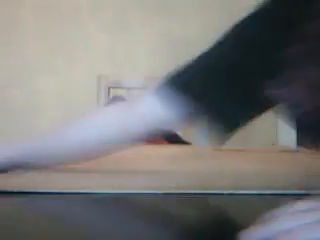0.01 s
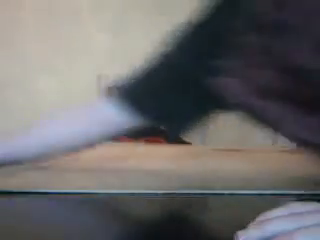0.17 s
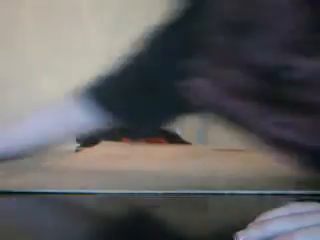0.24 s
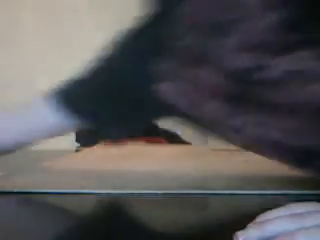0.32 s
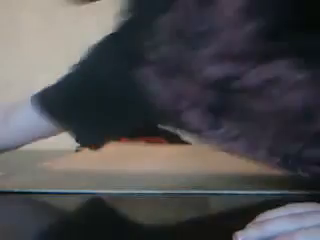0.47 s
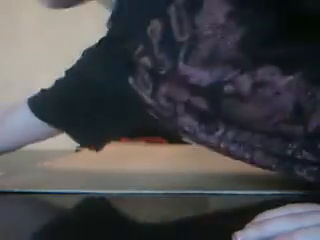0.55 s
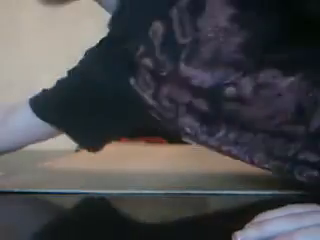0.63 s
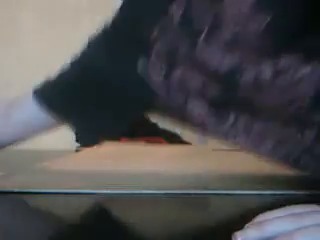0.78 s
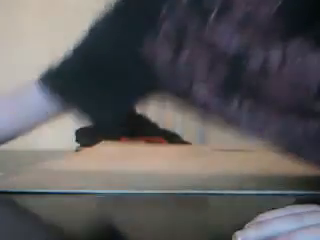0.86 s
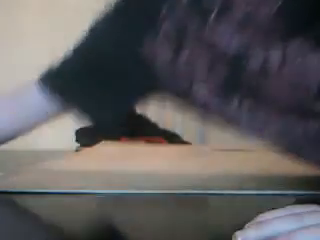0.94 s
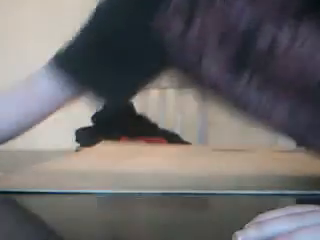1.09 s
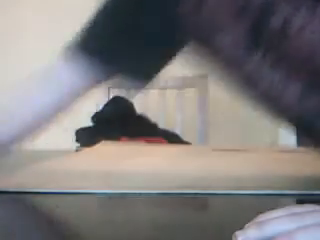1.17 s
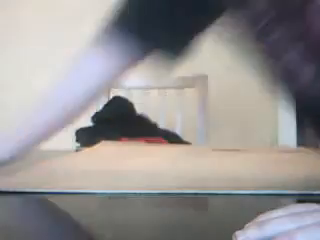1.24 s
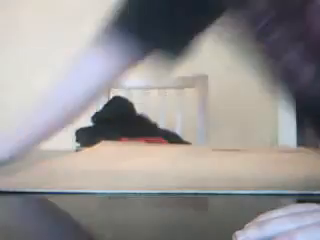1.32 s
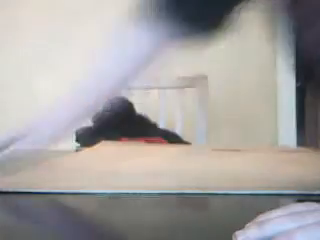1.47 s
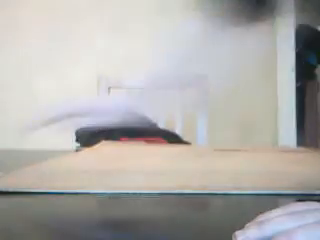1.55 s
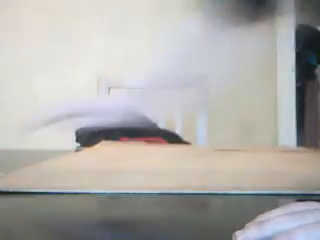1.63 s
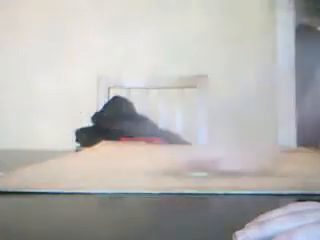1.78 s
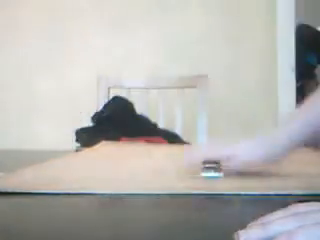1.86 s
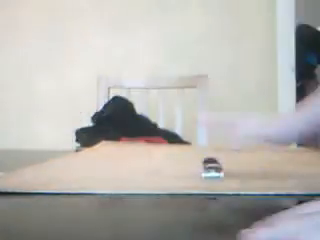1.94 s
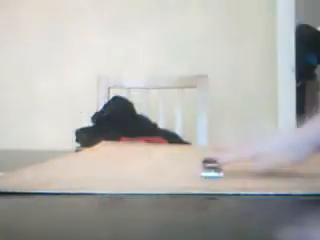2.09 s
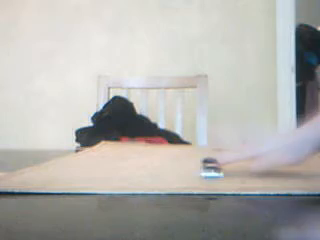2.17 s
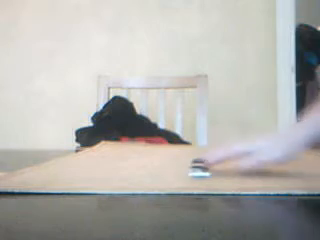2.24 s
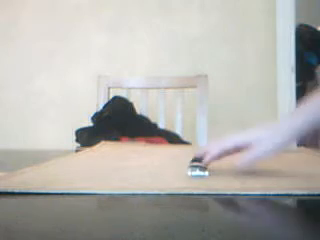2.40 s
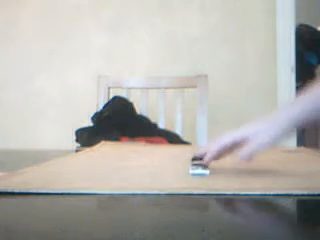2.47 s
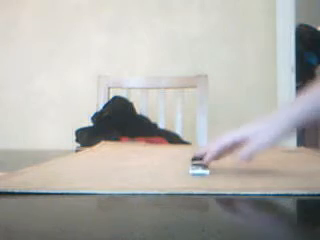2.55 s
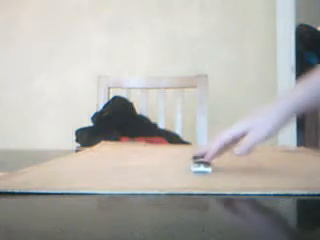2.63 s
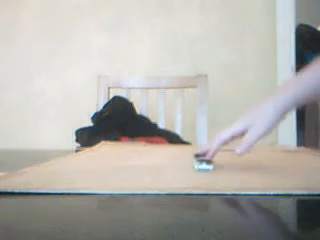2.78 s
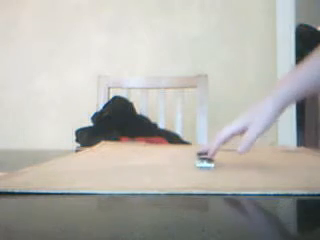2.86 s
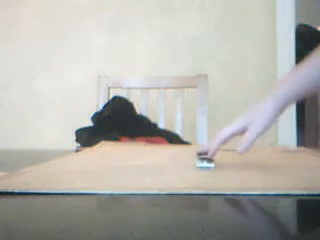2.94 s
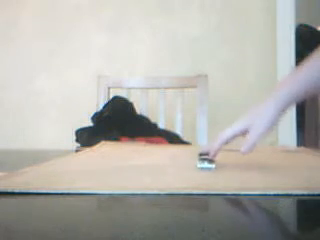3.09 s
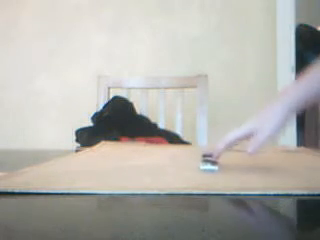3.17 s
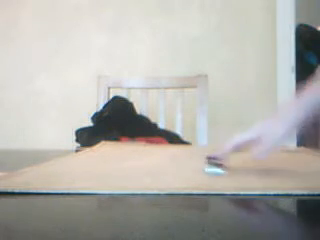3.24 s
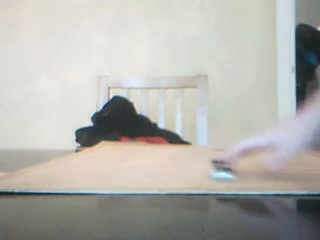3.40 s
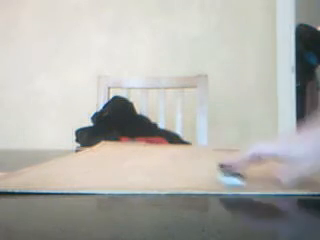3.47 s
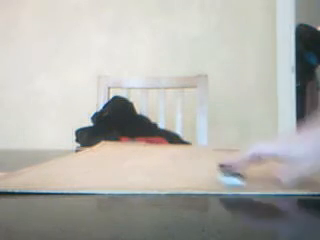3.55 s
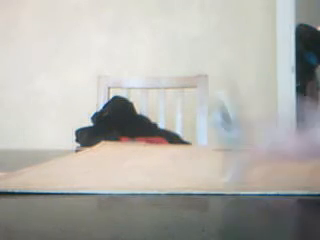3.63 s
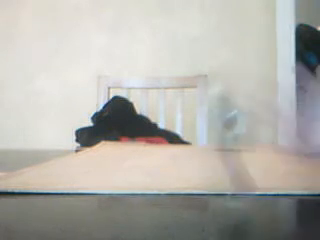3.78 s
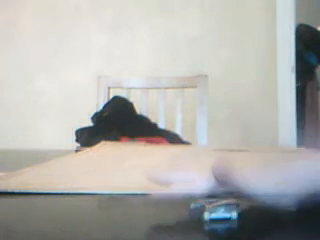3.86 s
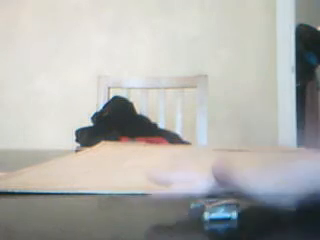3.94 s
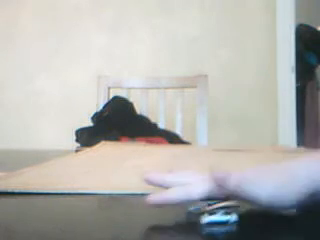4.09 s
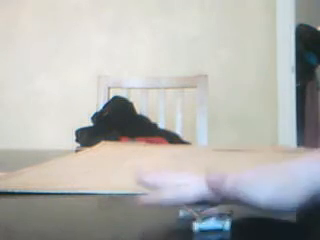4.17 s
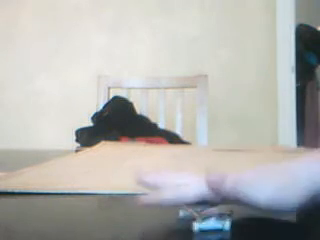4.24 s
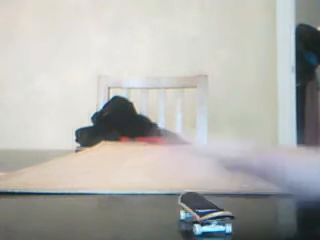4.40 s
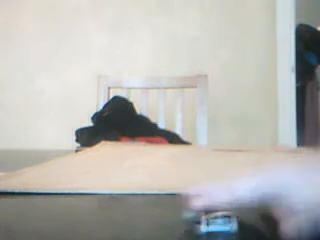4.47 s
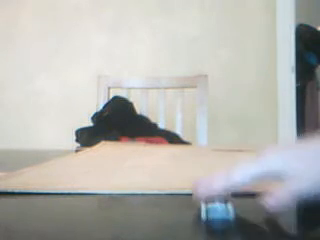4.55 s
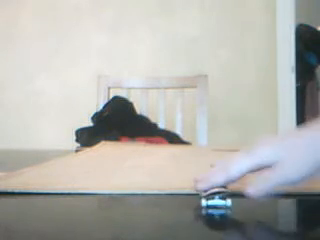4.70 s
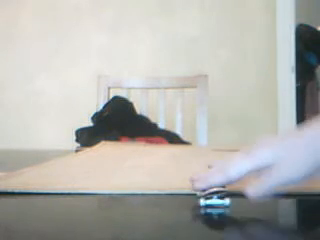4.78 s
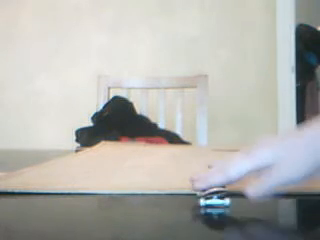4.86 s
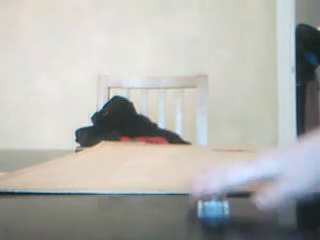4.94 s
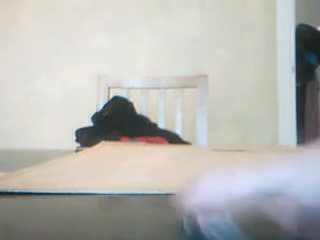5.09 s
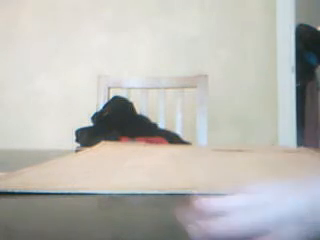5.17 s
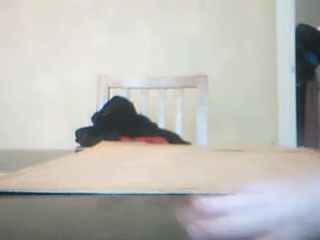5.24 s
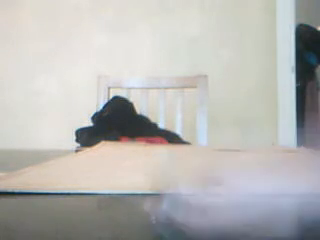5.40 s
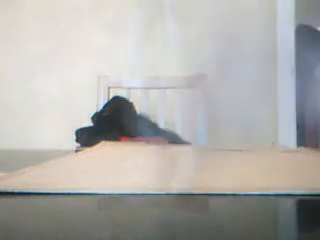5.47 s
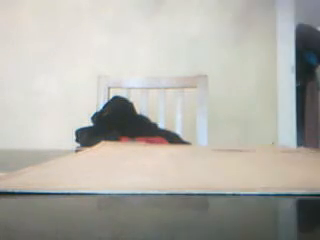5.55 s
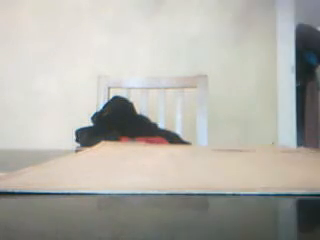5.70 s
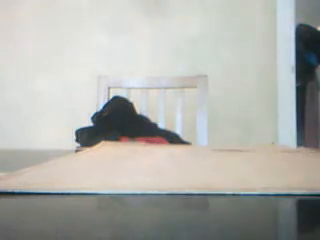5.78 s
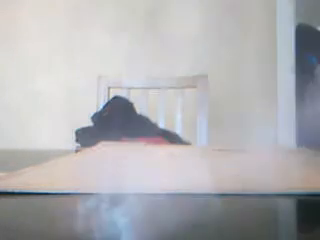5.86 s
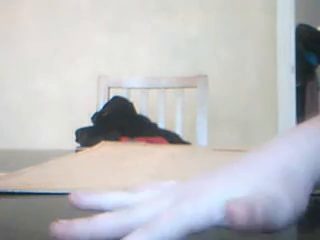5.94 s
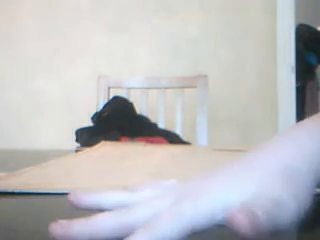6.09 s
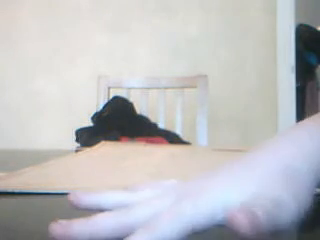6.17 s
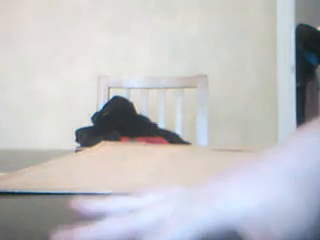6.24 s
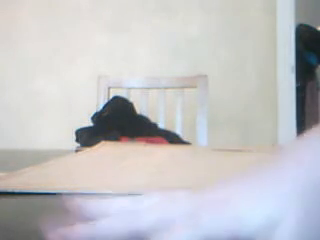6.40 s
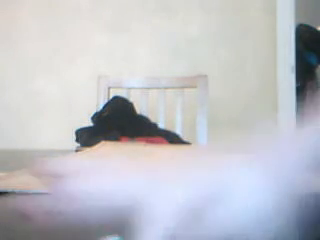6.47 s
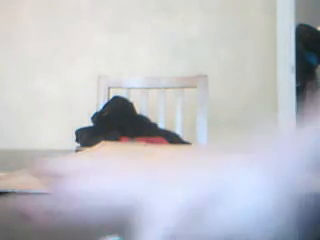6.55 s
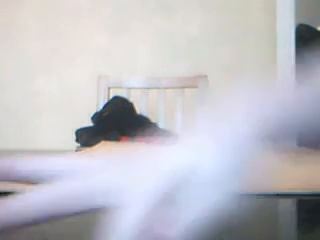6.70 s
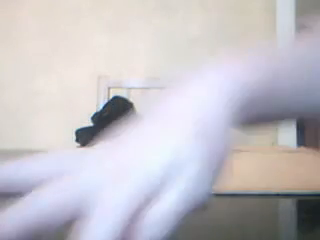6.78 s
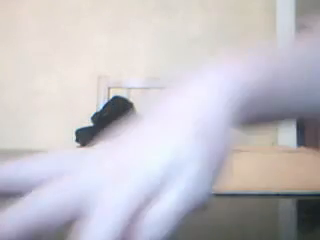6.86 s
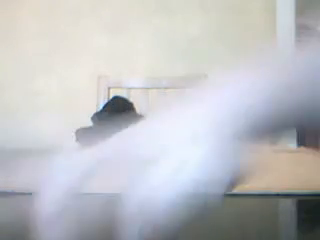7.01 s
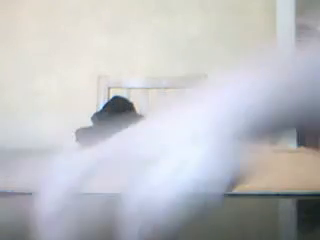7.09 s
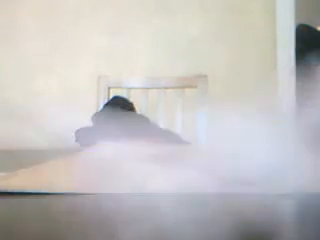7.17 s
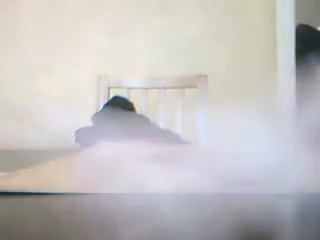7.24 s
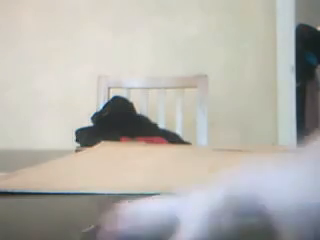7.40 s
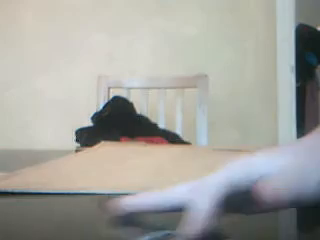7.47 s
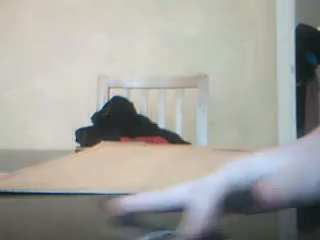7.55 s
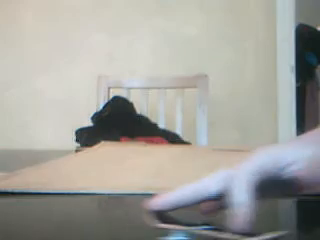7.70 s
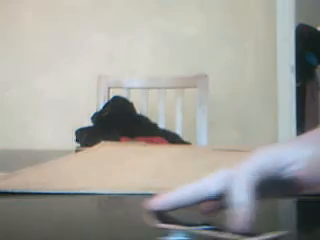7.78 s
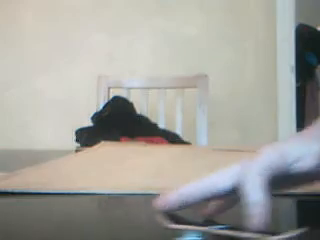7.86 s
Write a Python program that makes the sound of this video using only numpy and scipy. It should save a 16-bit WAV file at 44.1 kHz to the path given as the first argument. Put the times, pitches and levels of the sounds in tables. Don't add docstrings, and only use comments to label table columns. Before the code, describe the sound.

Close on a table in a small bare room, a cheap microphone hears a thin fan hiss and whine. A toy skateboard is dragged over wood, cracks down hard, rolls in growing strokes, then pops and lands in sharp clacks. After a firm scrape it crashes with a low thud and metallic rattle, then only light taps and rubs remain.

```python
import sys
import numpy as np
from scipy import signal
from scipy.io import wavfile
from scipy.ndimage import uniform_filter1d

SR = 44100
rng = np.random.default_rng(int(sys.argv[2]) if len(sys.argv) > 2 else 0)


def bounce(signal):
    frames = np.transpose(np.atleast_2d(signal))
    limited = np.clip(frames, -1, 1)
    pcm = np.round(limited * 32767).astype(np.int16)
    wavfile.write(sys.argv[1], SR, pcm)


def convert_level_to_amplitude(level_db):
    exponent = np.asarray(level_db, float) / 20
    return 10 ** exponent


N = 349713

# (frequency [Hz], level [dB per Hz])
FAN_HISS = [(40, -42.5), (80, -28), (130, -22), (400, -21.5), (900, -17), (1600, -19), (2350, -16.5),
            (3070, -6), (3400, -10), (4400, -25), (6900, -30), (7250, -40.5), (8150, -34), (8400, -74.5)]
FAN_HISS_DB = -44
# (frequency [Hz], rms level [dB], waver [Hz])
FAN_WHINE = [(1570, -57, 0.5), (2940, -56.5, 4.3), (3134.2, -49, 1.89), (3300, -76.5, 3.4),
             (3746, -57, 5.2)]
# (start [s], end [s], frequency [Hz], level [dB])
TABLE_DRONE = (0.7, 1.53, 195.5, -59.5)

# (frequency [Hz], t60 [s])
ROOM_DECAY = [(100, 0.48), (260, 0.89), (700, 0.46), (1840, 0.44), (4850, 0.43)]
# (delay [s], level [dB])
NEAR_ECHOES = [(.0035, -13), (.0075, -14), (.0115, -14), (.017, -16), (.021, -16), (.027, -17)]
PEAK_HZ, PEAK_WIDTH_HZ, PEAK_DB = 3150, 263, -2

# (start [s], fastest [s], end [s], rumble [dB], board resonance [Hz])
WHEEL_ROLLS = [
    (.93, 1.06, 1.2, -43, 1630),
    (2.0, 2.06, 2.25, -52.5, 1350),
    (2.38, 2.6, 2.75, -44, 1170),
    (2.83, 2.92, 3.03, -48.5, 1450),
    (2.95, 3.16, 3.3, -38.5, 1300),
    (3.2, 3.4, 3.44, -36.5, 1340),
]
# (start [s], fastest [s], end [s], rumble [dB], board resonance [Hz])
DECK_SLIDES = [
    (0, .06, .22, -48, 1102),
    (.6, .78, .98, -41.5, 930),
    (1.92, 1.96, 2.05, -43, 1400),
    (4.24, 4.36, 4.6, -45, 960),
    (4.76, 5.0, 5.11, -41, 1030),
    (5.1, 5.17, 5.21, -36.5, 1050),
    (5.23, 5.28, 5.4, -48, 1400),
]
# (start [s], fastest [s], end [s], rumble [dB], board resonance [Hz])
FINGER_RUBS = [
    (7.2, 7.35, 7.62, -46, 1160),
    (7.5, 7.64, 7.8, -52, 1168),
]
# (start [s], fastest [s], end [s], rumble [dB], board resonance [Hz])
SLEEVE_SWISHES = [
    (1.36, 1.42, 1.52, -60, 1400),
    (3.3, 3.37, 3.43, -57.5, 1400),
    (6.1, 6.15, 6.2, -61.5, 1400),
    (6.33, 6.39, 6.45, -74, 1300),
    (7.1, 7.4, 7.7, -87, 1300),
]
# (spread of modes reached [Hz], wheel buzz [dB], grit [dB], grit begins [Hz])
ROLL_CONTACT = (605, 0, -22.5, 4994)
SLIDE_CONTACT = (533, 1, -6, 4791)
RUB_CONTACT = (186, -16, -12.5, 5504)
SWISH_CONTACT = (410, 6, 12, 4300)
# (frequency [Hz], width [Hz], level [dB])
BOARD_MODES = [(460, 57, -8.5), (723.14, 66, 2), (894, 140, -3), (1096, 62, -1), (1220, 66, -4.5),
               (1400, 88, 0.5), (1600, 83, 5.5), (1944, 210, 2.5)]
# (frequency [Hz], level [dB])
ROLL_COLOUR = [(1060, -42.5), (1800, -12.5), (2300, -11), (2660, -9), (3080, -1), (3660, -5), (5040, -18.5),
               (6850, -24.5), (8300, -35.5), (10800, -70), (18300, -120)]

# (frequency [Hz], level [dB], t60 [s])
TABLE_MODES = [(55.17, -10, 0.2), (85, -11, 0.076), (117.3, 11, 0.039), (166.6, -2.5, 0.16),
               (204, 0.5, 0.13), (262.7, -1, 0.19), (392, 1.5, 0.068), (469, -18.5, 0.24)]
# (frequency [Hz], level [dB], t60 [s])
LONG_RING = (330, -3.5, 0.48)
# (time [s], peak [dB], tilt [dB per octave], long ring [dB])
TABLE_THUDS = [(1.547, -25, 9, 4), (3.438, -29.5, 2, -5), (3.673, -27, 9.5, 8.5), (3.726, -31.5, 9, -23),
               (4.197, -37, 7.5, 1), (4.299, -48, -13, 2), (5.216, -31, 8, 6.5), (5.685, -8.5, -4, -6),
               (5.702, -22.5, 11, -14.5), (5.726, -21, 4.5, -21), (5.747, -24.5, 2, -2)]

# (start [s], end [s], level [dB], body [dB], tick [dB])
DECK_CLATTER = (5.687, 5.772, -8, -29.5, -6)

# (frequency [Hz], level [dB])
KNOCK_COLOUR = [(60, -18), (300, -28), (900, -10), (1500, -8), (2300, -7.5), (3200, -5), (3650, -10),
                (4400, -11), (6900, -13.5), (7300, -22), (8500, -27)]
# (frequency [Hz], width [Hz], level [dB])
BLOW_MODES = [(1050, 46, 3), (2060, 57, 5), (2750, 89, 1)]
# (delay [s], strength [ratio])
FLAM_TOUCHES = [
    (.0006, -.8),
    (.0014, .85),
    (.0022, -.5),
]
# (time [s], peak [dB], ring [Hz], wheel tick [dB], room share [dB])
WHEEL_BLOWS = [(1.5449, 1.5, 3420, -10, 3), (3.3083, -20.5, 3030, -16, 0), (3.4385, -1, 3250, -2.5, 3),
               (3.6745, -3.5, 3100, 0, 1), (3.6782, -2.5, 3400, 3, -6), (3.688, -17.5, 3900, -6, 12),
               (4.1991, -5, 5500, 4, -15), (4.2004, -15, 3190, 2.5, 8.5), (4.3206, -22.5, 4470, -8, -6),
               (4.3604, -21.5, 4470, 7, 3), (5.217, 3.5, 3200, 3, -6), (6.3499, -17.5, 3120, -0.5, -4),
               (6.3906, -17.5, 3240, 0, -1.5), (6.4844, -33, 4130, 4.5, -7), (6.6604, -26.5, 4900, 1.5, -6),
               (6.8076, -9.5, 3940, 4.5, -6.5), (6.8112, -11.5, 4300, 8, -9), (7.4376, -30.5, 3150, 20, -3)]
# (time [s], peak [dB], ring [Hz], wheel tick [dB], room share [dB])
DECK_BLOWS = [(.787, -22.5, 1900, 9, 6.5), (1.5351, 0.5, 2550, -2, 4), (1.5435, 1, 2410, 2.5, -3.5),
              (1.9417, -38.5, 3140, 7, -13), (3.102, -27, 3060, -12.5, 3), (3.4457, -9, 3300, -7.5, 4),
              (3.7189, 2.5, 2750, 10.5, 3), (3.7283, 1, 2080, 0.5, 2.5), (3.738, -9, 1080, -2.5, 4),
              (4.8189, -36, 3150, -2, 11), (4.8935, -26, 3230, -13, 9.5), (5.1579, -16.5, 2710, -8, 11.5),
              (5.684, 1.5, 3105, -10, 1), (6.614, -33, 3150, -4.5, -4), (6.6462, -35, 3120, -5, 13),
              (7.14, -33, 1800, -2, 6), (7.4037, -27, 2713, -11, 0)]
# (time [s], peak [dB], ring [Hz], wheel tick [dB], room share [dB])
AXLE_BLOWS = [
    (5.705, -18, 5820, 5.9, -11),
    (5.727, -7, 5361, 3.4, -2),
    (5.744, -5, 6350, 14, -0.5),
    (5.755, 2, 6600, 24, -2),
]
WHEEL_BODY_DB, DECK_BODY_DB, AXLE_BODY_DB = -9, 1, -19
KNOCK_DELAY_S = .001

BAND_EDGE_HZ = 8250


def evened(x):
    return x / np.sqrt(np.mean(x ** 2) + 1e-20)


def read(points, hz):
    f, value = np.transpose(points)
    return np.interp(np.log(hz + 1), np.log(f + 1), value)


def add(mix, s, sound):
    part = mix[round(s * SR):][:len(sound)]
    part += sound[:len(part)]


def colour(x, points, extra_db=lambda hz: 0):
    hz = abs(np.fft.fftfreq(4096, 1 / SR))
    log_gain = np.log(convert_level_to_amplitude(np.maximum(read(points, hz) + extra_db(hz), -90)))
    phase = signal.hilbert(log_gain).imag
    taps = np.fft.ifft(np.exp(log_gain - 1j * phase)).real[:2048]
    return signal.oaconvolve(x, taps)[:len(x)]


def resonate(x, hz, width):
    turn = np.exp(2j * np.pi * np.cumsum(hz * np.ones(len(x))) / SR)
    r = np.exp(-np.pi * width / SR)
    return 2 * (turn * signal.lfilter([1 - r], [1, -r], x / turn)).real


def band(x, lo_hz, hi_hz):
    return signal.sosfilt(signal.butter(3, [lo_hz, hi_hz], "band", fs=SR, output="sos"), x)


def drift(per_s):
    knots = rng.standard_normal(int(N / SR * 40))
    smooth = uniform_filter1d(knots, max(int(40 / per_s), 1))
    return np.interp(np.arange(N) * 40 / SR, np.arange(len(knots)), evened(smooth))


def grains(size, per_s, spread_db):
    hit, height, sign = rng.random((size, 3)).T
    return (hit < per_s / SR) * convert_level_to_amplitude(-spread_db * np.log(height + 0.00035)) * np.sign(sign - .5)


def fan():
    frames, hz = N // 256 + 5, np.fft.rfftfreq(1024, 1 / SR)
    a, b, patches = rng.standard_normal((frames, 513, 3)).T
    patches = evened(uniform_filter1d(uniform_filter1d(patches, 16, 0), 14, 1))
    z = (a + 1j * b) * convert_level_to_amplitude(read(FAN_HISS, hz)[:, None] + 0.97 * patches)
    hiss = signal.istft(z, nperseg=1024, noverlap=768)[1][:N]
    swell_db = .6 * drift(3)
    out = convert_level_to_amplitude(FAN_HISS_DB + swell_db) * evened(hiss)
    for line_hz, db, waver_hz in FAN_WHINE:
        turns = np.cumsum(line_hz + waver_hz * drift(8)) / SR
        flutter_db = 1.2 * drift(5)
        out += np.sqrt(2) * convert_level_to_amplitude(db + flutter_db) * np.sin(2 * np.pi * turns)
    return out


def drone():
    start, end, hz, db = TABLE_DRONE
    t = np.arange(start, end, 1 / SR)
    swell = np.sin(np.pi * (t - start) / (end - start)) ** 0.79
    return start, np.sqrt(2) * convert_level_to_amplitude(db) * np.sin(2 * np.pi * hz * t) * swell


def room(x):
    taps, count = np.zeros(SR), (SR - 109) // 16
    places = np.arange(108, SR - 16, 16) + rng.integers(0, 16, count)
    taps[places] = rng.choice([-1., 1.], count)
    hz, t, z = signal.stft(taps, SR, nperseg=256)
    tail = signal.istft(z * convert_level_to_amplitude(-60 * t / read(ROOM_DECAY, hz)[:, None]), SR, nperseg=256)[1]
    tail = tail * np.minimum(np.arange(len(tail)) / SR / .009, 1)
    tail = convert_level_to_amplitude(0.5) * tail / np.linalg.norm(tail)
    for k, (s, db) in enumerate(NEAR_ECHOES):
        add(tail, s, (-1) ** k * convert_level_to_amplitude(db) * np.ones(1))
    return signal.fftconvolve(x, tail)[:N]


def roll(start, fastest, end, db, hz, width, buzz_db, grit_db, grit_hz):
    t = np.arange(start, end, 1 / SR)
    push = np.interp(t, [start, fastest, end], [0, 1, 0])
    speed = np.sin(np.pi / 2 * push) ** 1.04
    grain = grains(SR // 2 + SR // 4, 3000, 2.6)[:len(t)]
    wander, span = rng.standard_normal((len(BOARD_MODES), SR)), round(.06 * SR)
    wander = uniform_filter1d(uniform_filter1d(wander, span), span)
    wander_db = 3 * evened(wander)[:, :len(t)]
    modes = 0
    for k, (f, w, mode_db) in enumerate(BOARD_MODES):
        reach = (-1) ** k * np.exp(-((f - hz) / width) ** 2)
        modes = modes + reach * convert_level_to_amplitude(mode_db + wander_db[k]) * resonate(grain, f, 0.66 * w)
    rumble = evened(evened(modes) + 0.31 * evened(band(grain, 250, 1600)))
    bright = colour(grain, ROLL_COLOUR)
    buzz = evened(band(bright, 1250, 2980))
    grit = evened(band(bright, grit_hz, 9100))
    return max(start, 0), convert_level_to_amplitude(db) * speed * (rumble + convert_level_to_amplitude(buzz_db) * buzz + convert_level_to_amplitude(grit_db) * grit)


def thud(peak_db, tilt_db, ring_db):
    t, luck = np.arange(16000) / SR, rng.standard_normal(len(TABLE_MODES))
    modes = []
    for g, (f, db, t60) in zip(luck, TABLE_MODES):
        modes.append((f, db + tilt_db * np.log2(f / 150) + 2.5 * g, t60))
    modes.append((LONG_RING[0], LONG_RING[1] + ring_db, LONG_RING[2]))
    out = sum(convert_level_to_amplitude(db - 60 * t / t60) * np.sin(2 * np.pi * f * t) for f, db, t60 in modes)
    out = out * np.minimum(t / 0.0036, 1)
    return convert_level_to_amplitude(peak_db) * out / abs(out).max()


def clatter():
    start, end, db, body_db, tick_db = DECK_CLATTER
    t = np.arange(0, end - start, 1 / SR)
    hits = grains(SR // 8, 1300, 3.0)[:len(t)]
    deck = evened(resonate(band(colour(hits, KNOCK_COLOUR), 1880, 7000), 3390, 570))
    body = evened(band(hits, 300, 1300))
    tick = evened(band(hits, 4700, 6900))
    level = convert_level_to_amplitude(db + 19 * np.exp(-t / 0.0021))
    return start, level * (deck + convert_level_to_amplitude(body_db) * body + convert_level_to_amplitude(tick_db) * tick)


def knock(peak_db, ring_hz, body_db, tick_db):
    t = np.arange(3000) / SR
    crack = (t == 0) + .035 * rng.standard_normal(len(t)) * np.exp(-t / .0012)

    def lift(hz):
        ring = 7.5 * np.exp(-((hz - ring_hz) / 550) ** 2)
        body = body_db / (1 + (hz / 1700) ** 4)
        tick = tick_db / (1 + (4600 / (hz + 1)) ** 6)
        modes = sum(db * np.exp(-((hz - f) / w) ** 2) for f, w, db in BLOW_MODES)
        return ring + body + tick + modes

    single = colour(crack, KNOCK_COLOUR, lift)
    stretch = rng.uniform(.7, 1.3)
    touches = sum(g * np.roll(single, round(s * stretch * SR)) for s, g in FLAM_TOUCHES)
    flam = single + .55 * touches
    return convert_level_to_amplitude(peak_db) * flam / abs(flam).max(), convert_level_to_amplitude(peak_db) * single / abs(single).max()


def scene():
    near, far = np.zeros(N), np.zeros((2, N))
    for blows, body_db in ((WHEEL_BLOWS, WHEEL_BODY_DB), (DECK_BLOWS, DECK_BODY_DB), (AXLE_BLOWS, AXLE_BODY_DB)):
        for k, (s, peak_db, hz, tick_db, room_db) in enumerate(blows):
            clack, single = knock(peak_db, hz, body_db, tick_db)
            add(near, s + KNOCK_DELAY_S, clack)
            add(far[k % 2], s + KNOCK_DELAY_S, convert_level_to_amplitude(room_db) * single)
    for s, *blow in TABLE_THUDS:
        add(near, s, thud(*blow))
    start, rattle = clatter()
    add(near, start, rattle)
    add(far[0], start, convert_level_to_amplitude(-4) * resonate(rattle, 3640, 1200))
    for rows, contact in ((WHEEL_ROLLS, ROLL_CONTACT), (DECK_SLIDES, SLIDE_CONTACT),
                          (FINGER_RUBS, RUB_CONTACT), (SLEEVE_SWISHES, SWISH_CONTACT)):
        for row in rows:
            add(near, *roll(*row, *contact))
    add(near, *drone())
    wet = room(far[0]) + room(far[1])
    peak = convert_level_to_amplitude(PEAK_DB) * resonate(wet, PEAK_HZ, PEAK_WIDTH_HZ)
    return (near + wet + peak + fan())[None]


def band_limit(x):
    return signal.sosfilt(signal.butter(12, 15900, fs=SR, output="sos"), x)


def record(dry):
    ceiling, knee = .74, 34.0
    edge = signal.firwin(301, BAND_EDGE_HZ, window=("kaiser", 9), fs=SR)
    dry = signal.oaconvolve(dry, edge[None], "same")
    held = dry / (1 + abs(dry / ceiling) ** knee) ** (1 / knee)
    held = signal.sosfiltfilt(signal.butter(1, 8500, fs=SR, output="sos"), held)
    power = uniform_filter1d(held ** 2, 400, axis=1)
    coming, gone = np.roll(power, -200, axis=1), np.roll(power, 200, axis=1)
    ahead = np.sqrt(np.maximum(coming - 7.4 * gone, 0))
    noise = colour(rng.standard_normal(N), KNOCK_COLOUR)
    smear = evened(band(band(noise, 150, BAND_EDGE_HZ), 150, BAND_EDGE_HZ))
    offset = -.028
    return band_limit(held + convert_level_to_amplitude(-19.5) * ahead * smear + offset)


dry = scene()
out = record(dry)
bounce(out)
```